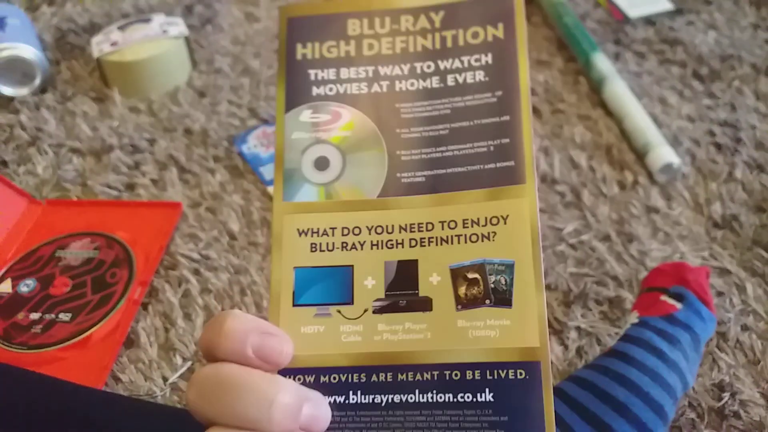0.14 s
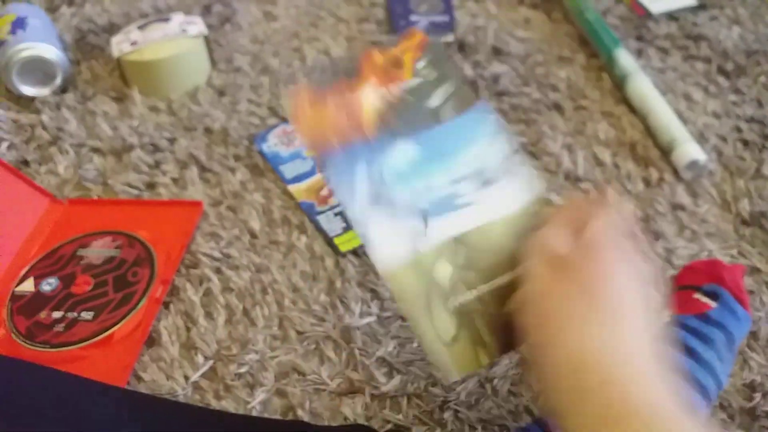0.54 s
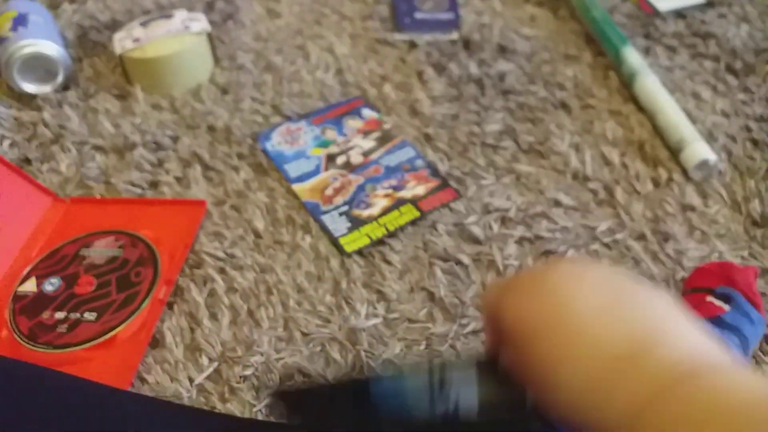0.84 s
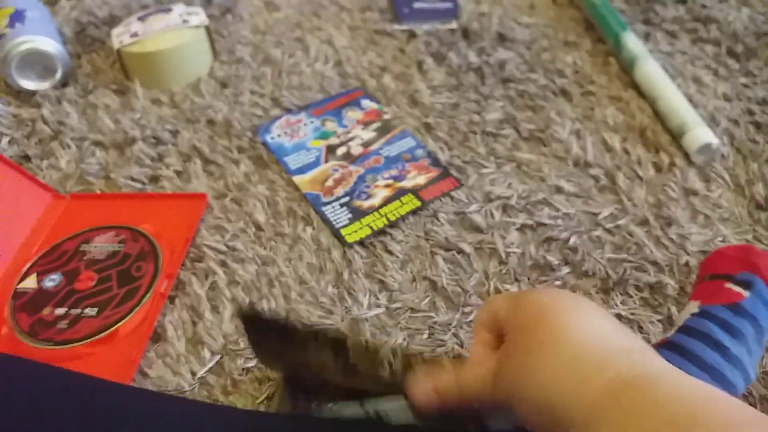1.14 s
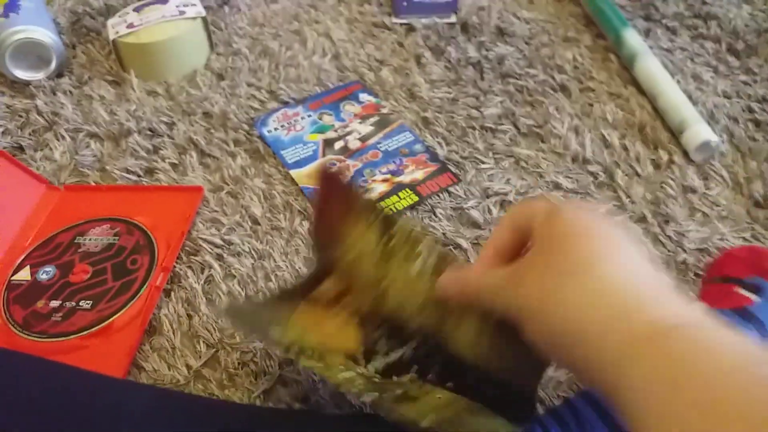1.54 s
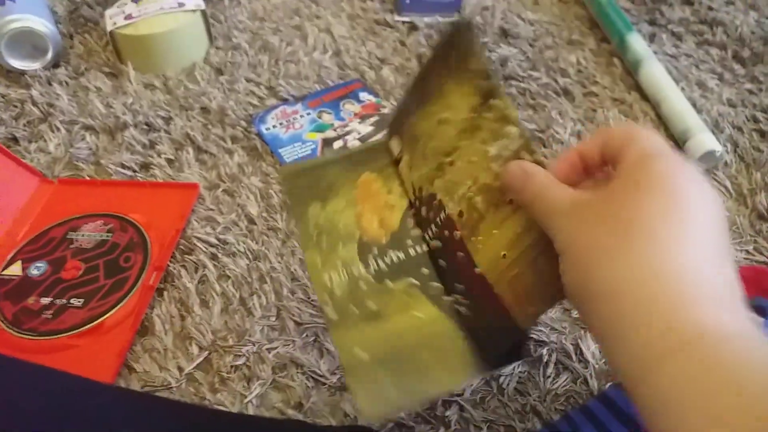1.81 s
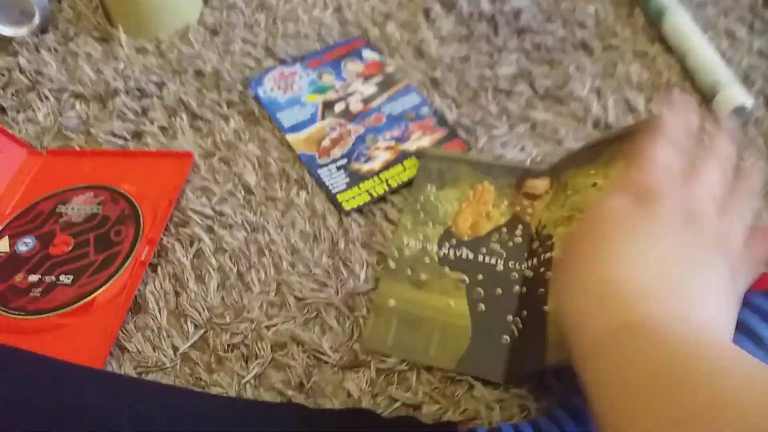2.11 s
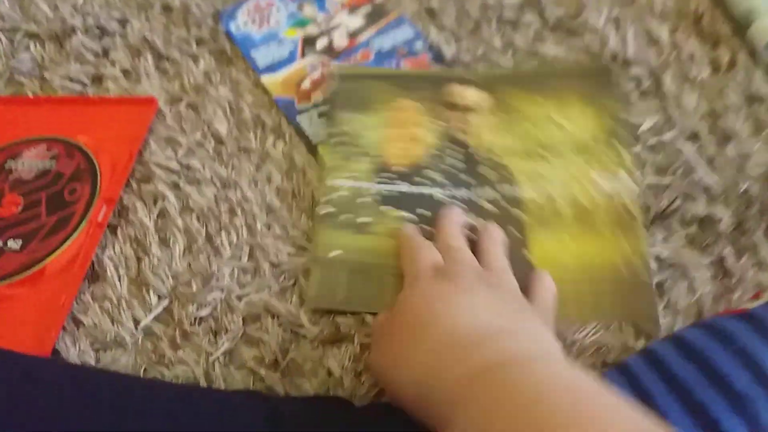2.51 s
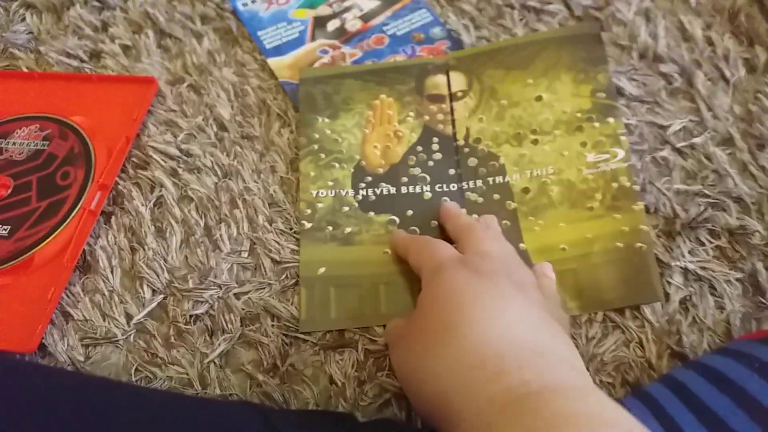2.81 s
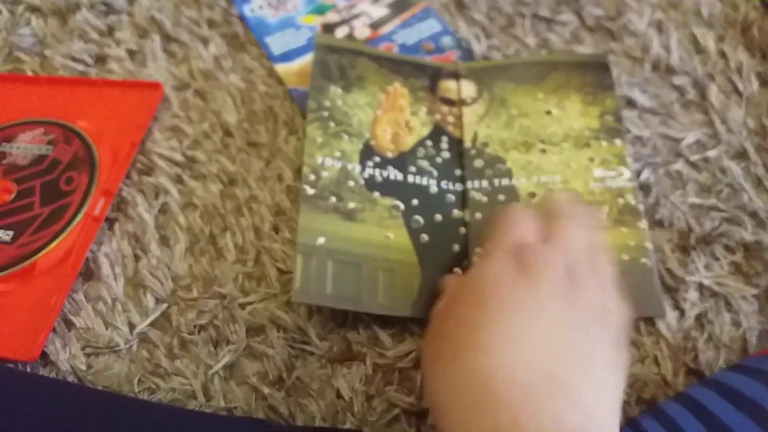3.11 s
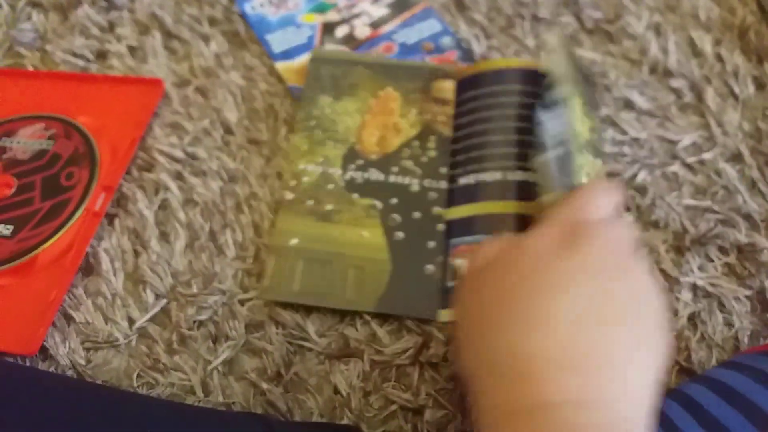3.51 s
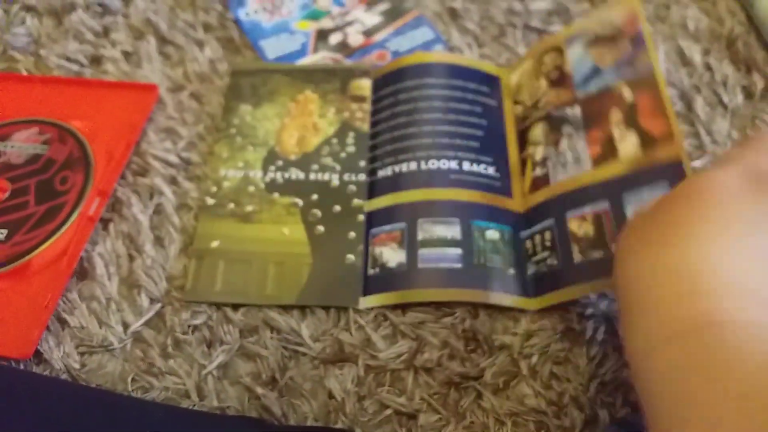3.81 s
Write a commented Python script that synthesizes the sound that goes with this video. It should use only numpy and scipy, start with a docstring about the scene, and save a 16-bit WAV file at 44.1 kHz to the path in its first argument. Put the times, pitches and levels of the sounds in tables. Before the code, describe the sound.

A glossy paper leaflet is turned over softly, then unfolded with crisp rustles, sharp crackles and pops, laid on carpet with dull thumps, smoothed and opened again, close to the microphone in a small quiet room.

```python
"""A glossy paper leaflet is turned over, unfolded, laid on a carpet and opened again, close by in a small room.
Its faces slide over each other by stick-slip: click trains and noise, filtered into hiss, midrange and rasp.
Creases crackle as short bursts of grainy noise; buckling panels pop as decaying tones that sink in pitch.
Sheet and hand land with thumps of low noise; a diffuse tail, room tone, a low hum and a rumble lie beneath."""
import sys
import numpy as np
from scipy import signal
from scipy.fft import rfft, irfft
from scipy.io import wavfile

SR = 44100
rng = np.random.default_rng(int(sys.argv[2]) if len(sys.argv) > 2 else 0)


def master(y):
    """Save y as 16-bit WAV."""
    cut = np.clip(np.atleast_2d(y).T, -1, 1)
    pcm = np.round(cut * 32767)  # scale
    wavfile.write(sys.argv[1], SR, pcm.astype(np.int16))


N = 174195
TIME = np.arange(N) / SR


def from_db(db):
    """Level to amplitude: 20 dB is a factor of ten."""
    return 10 ** (np.asarray(db) / 20)


def rms_one(x):
    """Normalization to unit root-mean-square amplitude."""
    return x / np.sqrt(np.mean(x ** 2) + 1e-20)


def in_time(rows):
    """Linear interpolation: joins the rows of a control curve by straight lines."""
    start_s, *columns = np.transpose(rows)
    return [np.interp(TIME, start_s, column) for column in columns]


def colour(x, spectrum):
    """Spectral shaping: weights each frequency, falls steeply beyond the table's ends, and sets rms to 1."""
    hz, db = np.transpose(spectrum)
    f = np.maximum(np.arange(N // 2 + 1) * SR / N, 1)
    skirts = np.minimum(1, np.minimum(f / hz[0], hz[-1] / f)) ** 8
    gain = from_db(np.interp(np.log(f), np.log(hz), db)) * skirts
    return rms_one(irfft(rfft(x) * gain, N))


def resonator(hz, width_hz):
    """Damped resonance as a pole pair, with unit gain at its peak; returns the filter coefficients."""
    r = np.exp(-np.pi * width_hz / SR)
    zeros = np.array([1, 0, -1]) * (1 - r * r) / 2
    poles = [1, -2 * r * np.cos(2 * np.pi * hz / SR), r * r]
    return zeros, poles


def resonate(x, hz, width_hz):
    """Resonance at a fixed frequency: a narrow band is passed and the rest attenuated."""
    return signal.lfilter(*resonator(hz, width_hz), x)


def glide(x, hz, width_hz, size=128):
    """Time-varying resonance: the centre follows a curve block by block while the stored energy carries over."""
    out, state = np.zeros(N), np.zeros(2)
    for i in range(0, N, size):
        zeros, poles = resonator(hz[i], width_hz)
        out[i:i + size], state = signal.lfilter(zeros, poles, x[i:i + size], zi=state)
    return out


def drift(rate_hz):
    """Low-passed random fluctuation: white noise through two equal poles at the given rate, rms 1."""
    r = np.exp(-2 * np.pi * rate_hz / SR)
    return rms_one(signal.lfilter([1], [1, -2 * r, r * r], rng.standard_normal(N)))


def burst(start_s, rise_s, t60_s):
    """Impulsive envelope: a quick rise, then exponential decay by 60 dB per t60."""
    age = np.maximum(TIME - start_s, 0)
    return (1 - np.exp(-age / rise_s)) * from_db(-np.minimum(60 * age / t60_s, 200))


def background():
    """Superposed steady noise and tone: room tone, a wavering hum and the hand-held microphone's rumble."""
    # spectrum of the room tone: frequency_hz, density_db
    room_tone_spectrum = [(40, -12), (90, -2), (170, -3), (260, -11), (500, -20), (1200, -27), (3000, -28),
                          (6000, -26), (9000, -30), (15500, -28)]
    # level of the low end over time: start_s, hum_level_db, handling_level_db
    low_end = [(0, -88, -71), (0.5, -79, -66), (0.9, -69, -62), (1.6, -66, -66), (2.3, -70, -66),
               (3.0, -81, -69.5), (3.95, -78, -93)]
    room_tone_db, hum_hz, hum_waver_db = -69, 53, 0.5
    handling_hz, handling_width_hz = 80.6, 97  # width of each of two passes
    hum_db, handling_db = in_time(low_end)
    tone = from_db(room_tone_db) * colour(rng.standard_normal(N), room_tone_spectrum)
    hum = rms_one(np.sin(2 * np.pi * hum_hz * TIME))
    hum = from_db(hum_db + hum_waver_db * drift(4.7)) * hum
    rumble = resonate(rng.standard_normal(N), handling_hz, handling_width_hz)
    rumble = resonate(rumble, handling_hz, handling_width_hz)
    return tone + hum + from_db(handling_db) * rms_one(rumble)


def room(x):
    """Diffuse reverberation: convolution with exponentially decaying noise, one second long."""
    room_db, room_t60_s, room_delay_s = -11, 0.5, 0.001
    # the delay also serves as the rise time of the tail
    tail = (rng.standard_normal(N) * burst(room_delay_s, room_delay_s, room_t60_s))[:SR]
    return from_db(room_db) * signal.fftconvolve(x, tail / np.linalg.norm(tail))[:N]


def thumps():
    """Damped impact: dull puffs of band-limited noise as the sheet flaps or is pressed on the carpet."""
    # soft landings of sheet and hand: start_s, level_db, t60_s, upper_edge_hz
    landings = [(0.849, -53.5, 0.26, 430), (1.125, -54.5, 0.45, 516), (1.299, -46, 0.15, 690),
                (1.479, -51, 0.48, 520), (2.129, -45, 0.047, 206), (2.261, -54.5, 0.49, 272),
                (2.301, -48.5, 0.64, 950), (2.332, -47.5, 0.3, 1050), (2.417, -48.5, 0.079, 1110),
                (2.775, -43.5, 0.044, 403), (3.666, -40, 0.18, 850), (3.706, -42.5, 0.25, 510)]
    rise_s, low_hz = 0.0019, 163
    out = np.zeros(N)
    for start_s, db, t60_s, top_hz in landings:
        edges_hz = [min(low_hz, top_hz / 2), top_hz]
        band = signal.butter(2, edges_hz, "band", fs=SR, output="sos")
        puff = rms_one(signal.sosfilt(band, rng.standard_normal(N)))
        out += from_db(db) * burst(start_s, rise_s, t60_s) * puff
    return out


def pops():
    """Snap-through buckling: a panel flips and rings untidily, sinking in pitch as it relaxes."""
    # panels that buckle, before the final band-pass: start_s, level_db, pitch_hz (a quarter t60 in), t60_s
    buckles = [(0.4443, -45.5, 2600, 0.033), (0.5905, -32.5, 420, 0.015), (0.5905, -38, 1540, 0.0032),
               (0.5905, -32.5, 2180, 0.01), (1.4365, -20, 1640, 0.0018), (1.459, -17.5, 2170, 0.0096),
               (2.068, -39, 2330, 0.016), (2.333, -27.5, 1120, 0.013), (2.350, -13.5, 2130, 0.007),
               (2.3502, -17.5, 1090, 0.0032), (2.4245, -32, 2000, 0.026), (3.349, -35.5, 1680, 0.01),
               (3.6668, -19, 2460, 0.018), (3.6678, -12.5, 1567, .021)]
    rise_s, chaos, width_hz = 0.00026, 0.43, 540  # chaos: rms of the noise beside the tone
    sag_share = 0.22  # fall in pitch over one t60, as a share of the table's pitch
    low_hz, top_hz = 760, 3470  # band of the pops: their sharp starts are softened below and above it
    white, out = rng.standard_normal(N), np.zeros(N)
    for start_s, db, hz, t60_s in buckles:
        age = np.maximum(TIME - start_s, 0)
        sinking_hz = hz * (1 + sag_share * (0.25 - np.minimum(age / t60_s, 1)))
        cycles = np.cumsum((age > 0) * sinking_hz) / SR
        ring = np.sin(2 * np.pi * cycles) + chaos * rms_one(resonate(white, hz, width_hz))
        out += from_db(db) * burst(start_s, rise_s, t60_s) * ring
    band = signal.butter(2, [low_hz, top_hz], "band", fs=SR, output="sos")
    return signal.sosfilt(band, out)


def crackles():
    """Sudden release of strain: each crease gives way in a grainy burst with its own resonance."""
    # creases that give way: start_s, level_db, t60_s, strongest_pitch_hz
    creases = [(0.05, -54.5, 0.028, 4660), (0.415, -50, 0.012, 2670), (0.4426, -43, 0.014, 4670),
               (0.451, -42.5, 0.024, 4500), (1.2818, -31, 0.018, 5200), (1.293, -24, 0.017, 5170),
               (1.311, -26, 0.021, 4900), (1.371, -33, 0.026, 4770), (1.384, -26, 0.016, 4900),
               (1.4228, -21, 0.0045, 5160), (1.452, -21, 0.0064, 4930), (1.4592, -22, 0.013, 5300),
               (1.486, -32, 0.014, 5040), (2.0998, -38.5, 0.053, 7230), (2.12, -41.5, 0.035, 6200),
               (2.257, -47, 0.018, 6500), (2.296, -36, 0.016, 6200), (2.307, -29, 0.015, 6500),
               (2.308, -34, 0.03, 6300), (2.35, -26.5, 0.017, 3230), (3.217, -36, 0.0065, 6460),
               (3.3475, -33.5, 0.018, 2380), (3.484, -37, 0.067, 2340), (3.628, -30.5, 0.015, 4760),
               (3.663, -16.5, 0.028, 3740), (3.667, -25, 0.041, 5460), (3.693, -38, 0.18, 4540)]
    # spectrum common to all creases: frequency_hz, density_db
    crease_spectrum = [(500, -15), (1500, -9), (2400, 3.5), (3300, -10.5), (4800, 0), (6800, 2),
                       (9000, -13.5), (15500, -17)]
    rise_s, grain_db, width_hz = 0.0009, 3.5, 750
    focus = 6.8  # gain of the resonance beside the plain noise
    grain = from_db(grain_db * drift(540))
    fibres = colour(rng.standard_normal(N) * grain, crease_spectrum)
    out = np.zeros(N)
    for start_s, db, t60_s, hz in creases:
        crackle = rms_one(fibres + focus * resonate(fibres, hz, width_hz))
        out += from_db(db) * burst(start_s, rise_s, t60_s) * crackle
    return out


def slips():
    """Stick-slip friction: sparse clicks of uneven size and random sign on smooth friction noise."""
    slips_per_s, spread_db = 1900, 3  # mean rate; scale of the exponential spread in size
    smooth_share = 0.36  # share of the power in the smooth noise
    sizes = from_db(spread_db * np.minimum(rng.exponential(1, N), 3)) * rng.choice([-1, 1], N)
    clicks = rms_one(sizes * (rng.random(N) < slips_per_s / SR))
    return np.sqrt(1 - smooth_share) * clicks + np.sqrt(smooth_share) * rng.standard_normal(N)


def sliding():
    """Friction-driven radiation: slips excite hiss and the bending sheet's resonances; pressure adds rasp."""
    # each hand movement, before the trims below: start_s, hiss_level_db, midrange_level_db
    turn_over = [(0.0, -68, -84), (0.045, -66, -86), (0.084, -72.5, -95), (0.31, -76, -88),
                 (0.36, -64.5, -73.5), (0.432, -61.5, -67), (0.449, -51.5, -67), (0.478, -65, -70.5),
                 (0.52, -61, -68), (0.575, -64, -75)]
    regrip = [(0.61, -63, -58), (0.636, -54.5, -61), (0.762, -67.5, -78.5), (0.8, -59, -78)]
    pull_apart = [(0.81, -56, -76), (0.838, -45, -59), (0.857, -40.5, -53), (0.926, -46.5, -51),
                  (0.962, -47, -50), (0.985, -47.5, -48), (1.048, -50, -53.5), (1.143, -33.5, -39.5),
                  (1.228, -55, -59.5), (1.3, -32.5, -38), (1.311, -36, -36.5), (1.33, -45, -52.5),
                  (1.358, -46.5, -47.5), (1.395, -43, -48), (1.44, -48, -53)]
    swing_open = [(1.48, -40, -45), (1.488, -35.5, -44.5), (1.498, -48.5, -55), (1.556, -53.5, -62.5),
                  (1.634, -47.5, -57.5), (1.694, -60.5, -64), (1.802, -60.5, -65.5), (1.932, -70.5, -73),
                  (2.064, -50.5, -60), (2.126, -56.5, -59), (2.14, -60.5, -64), (2.24, -69.5, -103)]
    lay_down = [(2.255, -69, -61), (2.267, -60, -64.5), (2.314, -31.5, -40.5), (2.324, -47, -54.5)]
    smooth_flat = [(2.365, -50.5, -49.5), (2.433, -47.5, -54.5), (2.443, -50, -52.5), (2.517, -48.5, -56),
                   (2.699, -57, -64), (2.791, -51.5, -57), (2.83, -63.5, -69.5), (2.921, -63, -70.5),
                   (2.988, -54, -56), (3.115, -64, -66), (3.19, -63, -66.5)]
    lift_flap = [(3.21, -59, -78), (3.213, -58.5, -62), (3.336, -49.5, -54.5), (3.438, -51.5, -50.5),
                 (3.632, -40, -45.5), (3.645, -48, -54.5)]
    flap_settles = [(3.69, -37, -45), (3.699, -40, -39.5), (3.786, -53, -80), (3.924, -64, -66.5),
                    (3.95, -65, -83)]
    # the sheet's two resonances move as it bends: start_s, lower_hz, upper_hz
    bend = [(0.36, 2430, 6170), (0.44, 2590, 4750), (0.54, 2570, 6100), (0.66, 1970, 5650),
            (0.85, 2660, 5940), (1.01, 2100, 5040), (1.15, 2200, 5470), (1.39, 2080, 5200),
            (1.66, 2130, 5800), (1.72, 2210, 4100), (1.812, 1900, 5350), (2.07, 2280, 6530),
            (2.16, 2080, 6200), (3.37, 2180, 5560), (3.71, 1830, 4340)]
    # spectrum of the bright hiss: frequency_hz, density_db
    hiss_spectrum = [(1760, -105), (3000, -9), (4110, -1.5), (4570, 0.5), (5220, -3.5), (6760, -1),
                     (7940, -7), (8950, -15.5), (11000, -12), (12300, -16), (13700, -77), (15100, -20),
                     (16000, -14)]
    # spectrum of the broad midrange: frequency_hz, density_db
    midrange_spectrum = [(700, -23.5), (1100, -8), (1550, -1.5), (2100, 0), (2600, -3.5), (3800, -7)]
    # spectrum of the rasp under pressure: frequency_hz, density_db
    rasp_spectrum = [(180, -10), (400, -3.5), (750, 1), (1300, -25), (3000, 1), (8000, -50), (15500, -37)]
    hiss_trim_db, upper_trim_db, lower_trim_db, midrange_trim_db = -4.5, -8.5, -2, 0.5
    lower_width_hz, upper_width_hz = 800, 2830  # width of each of two passes
    judder_db, judder_hz = 2, 17.4
    flutter_db, flutter_hz = 2.5, 50  # the loose sheet flutters
    firm_db, firm_rasp_db = -27.5, -44.5  # midrange level that counts as firm; rasp level there
    # dB per dB of pressure: the broad midrange swells faster than the resonance, the rasp dies as it eases
    midrange_growth, rasp_growth = 1.2, 0.95

    movements = [turn_over, regrip, pull_apart, swing_open, lay_down, smooth_flat, lift_flap, flap_settles]
    hiss_db, mid_db = in_time(np.vstack(movements))
    pressure_db = mid_db - firm_db
    friction = slips() * from_db(judder_db * drift(judder_hz))
    lower_hz, upper_hz = in_time(bend)
    lower = glide(friction, lower_hz, lower_width_hz)
    lower = rms_one(glide(lower, lower_hz, lower_width_hz))
    upper = glide(friction, upper_hz, upper_width_hz)
    upper = rms_one(glide(upper, upper_hz, upper_width_hz))

    bright = from_db(hiss_trim_db) * colour(friction, hiss_spectrum) + from_db(upper_trim_db) * upper
    hiss = from_db(hiss_db) * bright
    resonance = from_db(mid_db + lower_trim_db + flutter_db * drift(flutter_hz)) * lower
    # the broad midrange and the rasp each have slips of their own
    broad_db = firm_db + midrange_trim_db + midrange_growth * pressure_db
    broad = from_db(broad_db) * colour(slips(), midrange_spectrum)
    rasp = from_db(firm_rasp_db + rasp_growth * pressure_db) * colour(slips(), rasp_spectrum)
    return hiss + resonance + broad + rasp


def scene():
    """Superposition of direct sound, reverberation and background."""
    pop_room_db = -10  # pops stir the room less than the other paper sounds
    paper = sliding() + crackles() + thumps()
    buckling = pops()
    reflections = room(paper + from_db(pop_room_db) * buckling)
    return (paper + buckling + reflections + background())[None]


def record(dry):
    """Band limitation: a steep elliptic low-pass removes the extreme treble."""
    cutoff_hz = 15750
    low_pass = signal.ellip(12, 0.1, 80, cutoff_hz, fs=SR, output="sos")
    return signal.sosfilt(low_pass, dry)


dry = scene()
out = record(dry)
master(out)
```